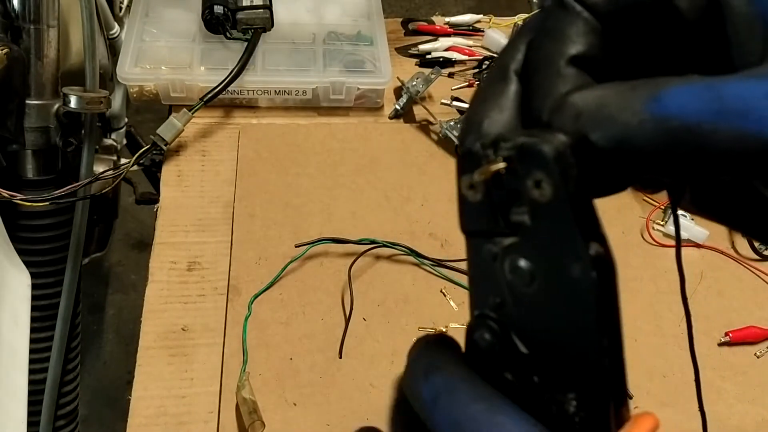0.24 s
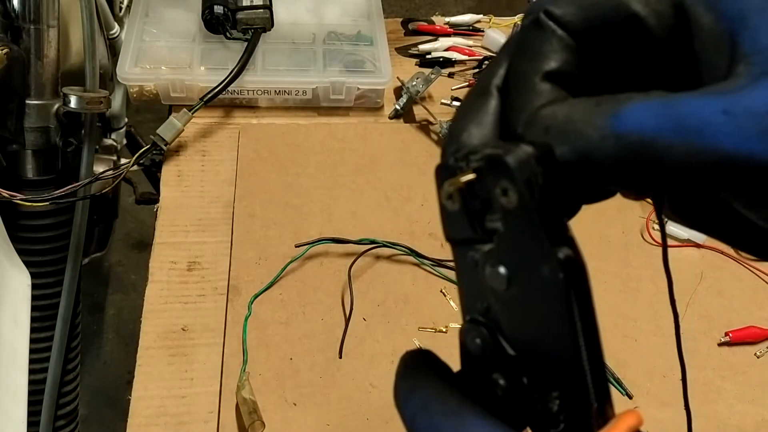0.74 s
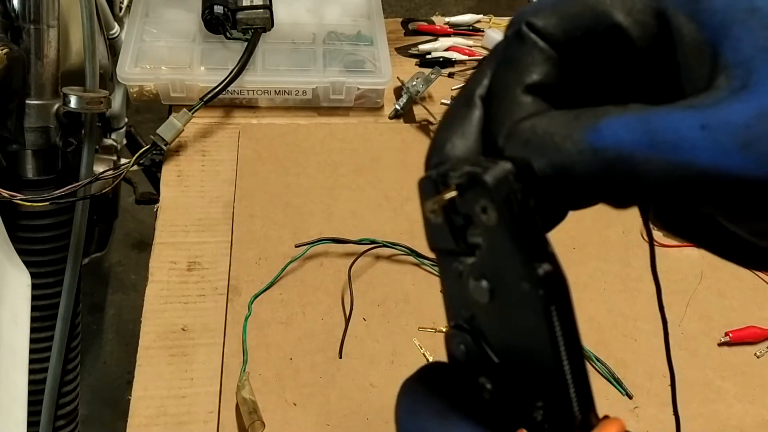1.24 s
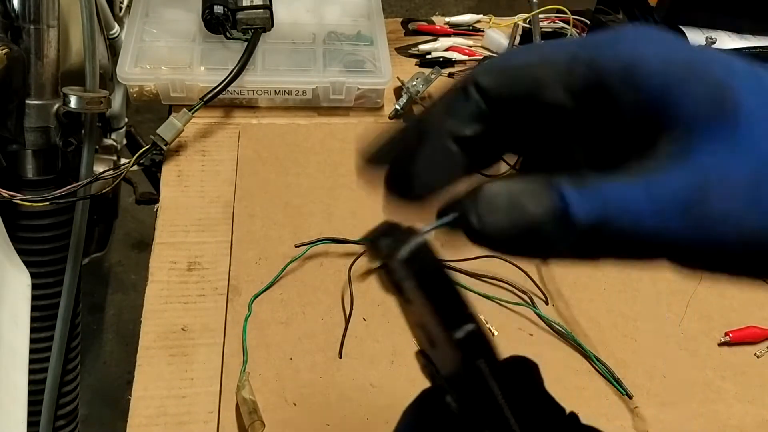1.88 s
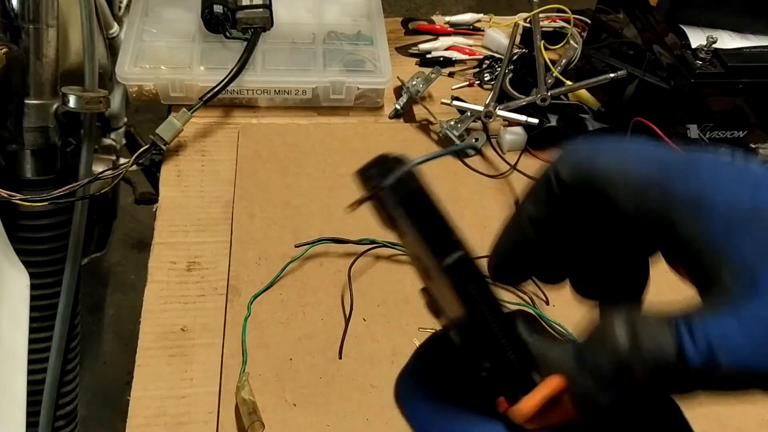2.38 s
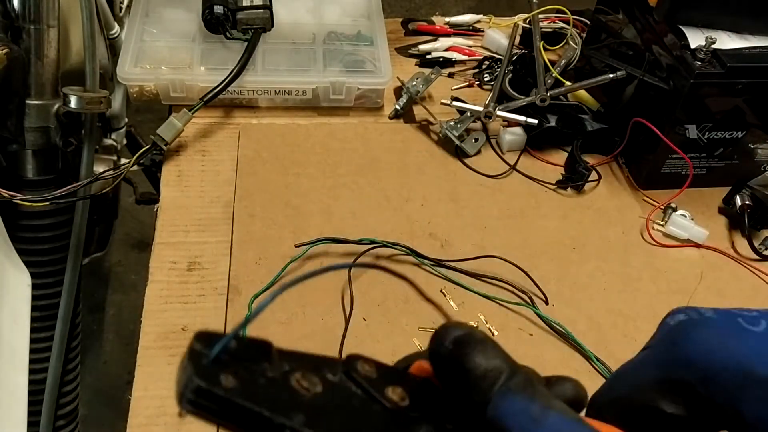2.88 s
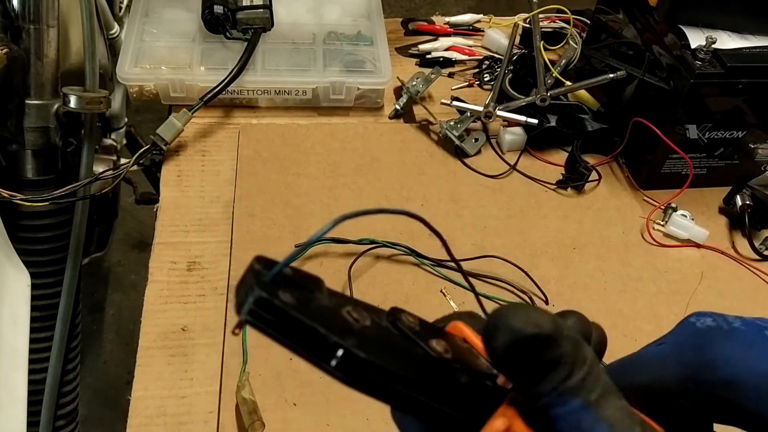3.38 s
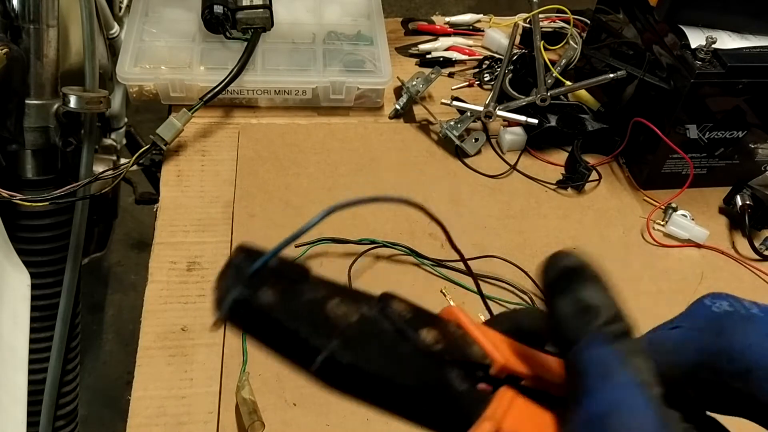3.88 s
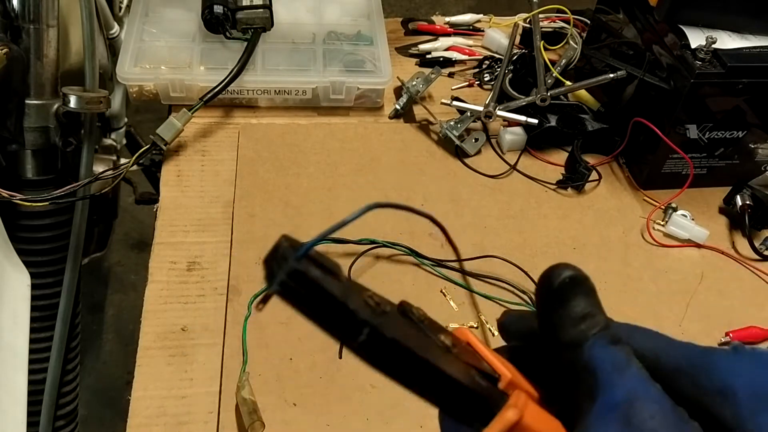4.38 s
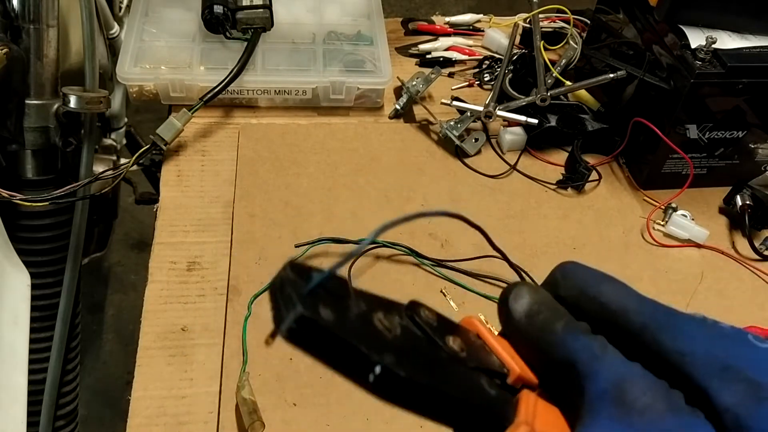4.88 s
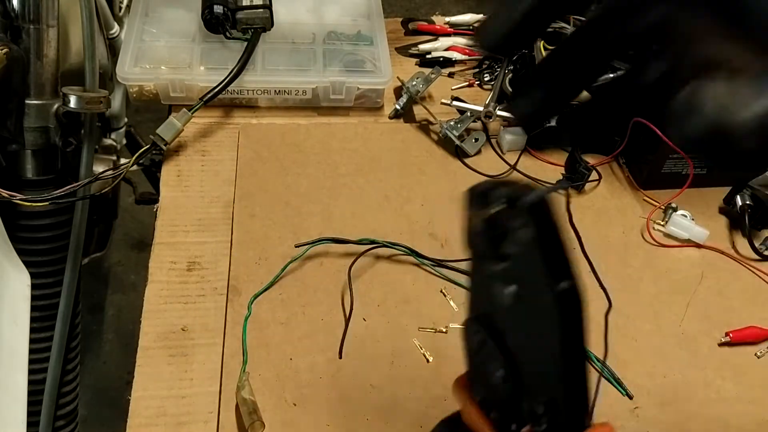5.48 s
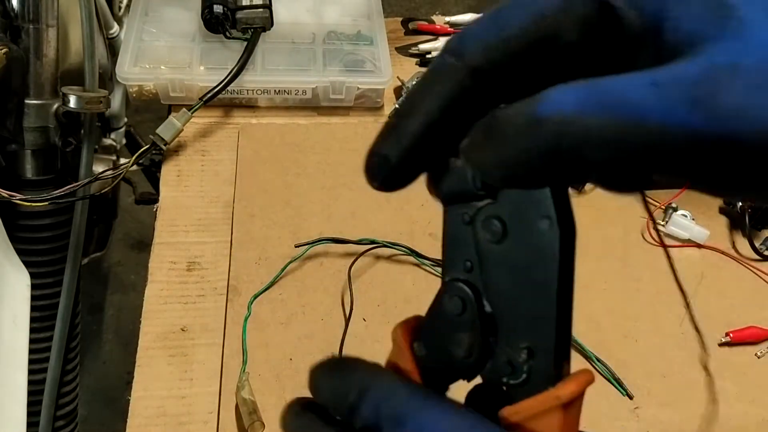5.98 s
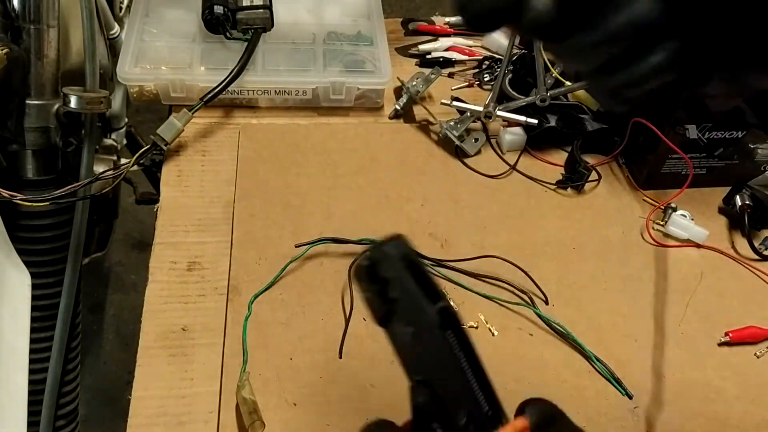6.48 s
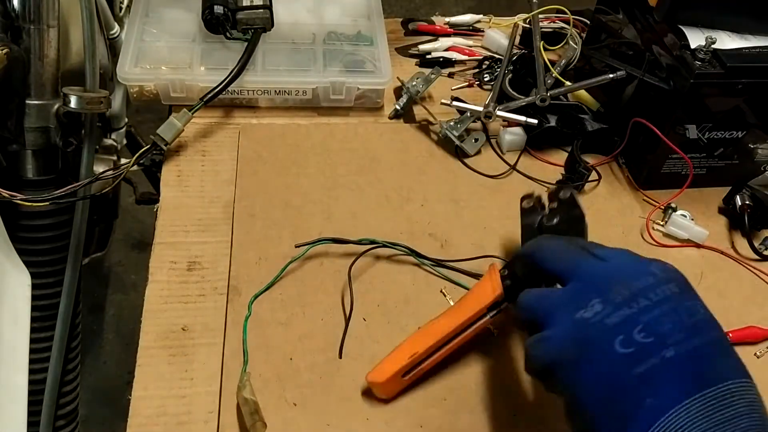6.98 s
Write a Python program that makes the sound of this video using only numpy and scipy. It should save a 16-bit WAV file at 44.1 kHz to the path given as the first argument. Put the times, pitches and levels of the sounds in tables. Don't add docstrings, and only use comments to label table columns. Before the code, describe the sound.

Ratchet crimping pliers snap sharply close up, steel ringing thinly, then a fast clicking run, glove rubs and a final clack onto a cardboard-covered bench.

```python
import sys
import numpy as np
from scipy import signal
from scipy.io import wavfile
from scipy.ndimage import uniform_filter1d, minimum_filter1d

SR = 44100
rng = np.random.default_rng(int(sys.argv[2]) if len(sys.argv) > 2 else 0)


def rack_gain(trim_db):
    fader = np.asarray(trim_db, float)
    return 10 ** (fader / 20)


def master_out(mix):
    frames = np.transpose(np.atleast_2d(mix))
    ceiling = np.clip(frames, -1, 1)
    pcm = np.round(ceiling * 32767).astype(np.int16)
    wavfile.write(sys.argv[1], SR, pcm)


N = 319680

# hz, density_db_per_hz
FLOOR = [(12, -42), (20, -26.5), (43, -3), (130, -15), (177, -5.5), (216, -7.5), (377, -6.5), (590, -11),
         (642, -18.5), (802, -14), (1220, -19), (1330, -18), (3160, -28), (6500, -28.5), (12000, -24),
         (16000, -61.5)]
# hz, level_db
HUM = [(49, -88.5), (100, -77), (185, -70.5)]
# hz, left_right_correlation
LIKENESS = [(60, 0.41), (180, 0.78), (550, 0.15), (1650, -0.39), (4970, 0.87), (11500, -0.22)]
# time_s, bass_db
FAR = [(0, -0.5), (.6, 0), (1.1, -2), (2.198, -3), (2.6, 1), (3.099, -0.5), (3.6, -0.5), (4.501, -2),
       (5.202, -2), (6.2, 1), (6.45, 3.5), (6.9, 5), (7.25, 5)]
# strongest_s, rise_s, fall_s, level_db, brightness_db
STROKES = [(.19, .04, 0.022, -64, -2), (1.97, .03, 0.02, -65, 12.5), (2.548, .04, 0.11, -62, 3),
           (2.69, .06, 0.059, -72, 11), (2.76, .09, 0.022, -61, 6), (2.92, .04, 0.23, -73.5, 6),
           (3.17, .05, 0.02, -56.5, 1), (3.73, .05, 0.043, -57.5, -0.5), (4.09, .04, 0.063, -61, 0),
           (4.335, 0.023, 0.021, -54.5, -1.5), (4.385, .06, 0.033, -62.5, .8), (4.7, .14, .16, -72.5, 5.5),
           (5.23, .03, .06, -62.5, 2), (5.295, .05, 0.025, -52.5, 4.3), (5.352, .05, 0.0069, -47, 4),
           (5.5, .05, 0.17, -60.5, 0.5), (5.6, .06, 0.025, -55, -4), (5.785, .12, 0.024, -62, -1),
           (6.45, .06, 0.36, -65.5, 1), (6.65, .1, 0.14, -64.5, .8), (6.82, .05, 0.17, -57.5, -2),
           (6.94, .09, 0.071, -50.5, 1.5), (7.182, 0.0072, 0.12, -43, -9.5)]
# start_s, end_s, level_db, brightness_db
SHIFTING = [
    (2.553, 3.418, -75.5, 0.2),
    (3.583, 4.238, -75.5, 2.2),
    (4.45, 4.995, -82, 4.5),
]
# hz, wet_db, t60_s
ROOM = [(300, -36, 0.5), (1020, -40, 1), (1800, -38.5, 0.39), (2640, -40.5, 1), (5310, -36, 0.76),
        (7890, -39.5, 0.71), (11480, -38, 0.55)]
# start_s, peak_db, bright_db, contact_ms
GRIP_TICKS = [(.713, -52.5, 9, 1.8), (1.9127, -41, 7, 0.54), (1.9668, -40.5, -27, .6),
              (1.9743, -39.5, -11, 1.8), (1.9775, -36, -29, 0.35), (1.9935, -43.5, 4, 0.88),
              (3.1463, -37, .6, 0.88), (3.2014, -30, -15, 1.8), (3.7426, -39, -34.5, 1.1),
              (3.7822, -34, 7, 2), (4.104, -40.5, -26, 6.1), (4.1414, -61, 23, 2.6),
              (4.1662, -60.5, 19, 4.9), (4.1824, -40.5, -35.5, 3.5), (5.2953, -28.5, 1, 1.4),
              (5.3469, -28.5, -29, 0.39), (5.5148, -36.5, -34, 0.73), (5.5869, -34, .6, 4.7),
              (6.9603, -48.5, 18.5, 4.7), (7.1727, -32.5, -9, 3.1)]
# start_s, peak_db, bright_db, contact_ms
PALM_KNOCKS = [(1.1662, -35.5, -1, 3.8), (1.5672, -31, -5.5, 0.69), (3.3452, -35.5, 2.5, 8.4),
               (3.3511, -46.5, 20, 3.5), (4.0786, -38.5, 2, 3.3), (5.0315, -51, -34, 6),
               (5.2451, -40.5, 12.5, 1.6), (5.568, -48.5, 13, 1.5)]
# start_s, peak_db, bright_db, contact_ms
THIN_TICKS = [(2.931, -31.5, -12, 0.5), (3.1608, -36.5, -18, 1.4), (3.179, -35, -24, 1.5),
              (3.1961, -42.5, 15, 2.6), (3.6686, -44.5, 1, 3.6), (3.738, -39, 8.5, .72),
              (5.2046, -43.5, -2.5, 4.1), (5.228, -44, 5.5, 1.8), (5.2627, -34.5, -10, .83),
              (5.6111, -35, -13, 1.7), (3.7581, -41.5, -1, 0.5), (5.835, -36.5, 20, 0.18),
              (7.211, -37, 17.5, 0.65), (5.879, -36, -14, 2.1), (6.8187, -37.5, 14, 1.1),
              (6.9516, -30, -13, 3)]
# start_s, peak_db, pawl_and_jaw_against_frame_db, handle_push_db, left_right_db
SNAPS = [
    (1.1822, -8, -1, -41, 0),
    (1.5289, -4, -6.5, -43.5, 0),
    (1.5831, -16.5, 8.5, -25.5, -0.5),
    (1.6703, -4, -6.5, -48.5, -0.5),
    (5.995, -3, -6, -40, -0.5),
    (6.0203, -5, -6, -40, 1),
    (6.05, -7, -4, -33, -3),
    (6.082, -8.5, -0.5, -37, -4),
    (6.1441, -3.5, -6.5, -63, 1),
    (7.1973, -7.5, -3.5, -36, 1.5),
]
# hz, width_hz, level_db
STEEL = [(2680, 610, -18.5), (5050, 990, 9), (7620, 2000, -0.5), (8185, 1600, -1), (11810, 3200, 9.5),
         (15250, 12000, 4), (3530, 1000, -15.5)]
# hz, level_db, t60_s
RINGS = [(3430, -67, .45), (3700, -62, .35), (4380, -63, .35), (5140, -58, .4), (8800, -50, .17),
         (10200, -58, .45), (4990, -62, .45), (5860, -62, .3), (11650, -58, .3)]
# start_s, pitch_hz, rise_hz_per_s, level_db, t60_s
SPRING = [
    (1.182, 10725, 340, -50, .9),
    (1.53, 10640, 340, -47, .8),
    (1.669, 11095, 0, -59, 1.6),
    (1.669, 10560, 0, -63, 1.8),
    (6.144, 10980, 0, -52, .8),
]
# start_s, peak_db, pitch_hz
SET_DOWN = [
    (7.187, -12, 1020),
]
PORT_DB = [4.5, -11]
TOP_DB = [
    [-15],
    [-30],
]


def rms_one(x):
    return x / np.sqrt(np.mean(x ** 2) + 1e-20)


def peak_one(x):
    return x / (2.2 * np.sqrt(np.mean(x[..., :150] ** 2, axis=-1, keepdims=True)))


def at_hz(points, hz, axis=1):
    points = np.array(points)
    return np.interp(np.log(hz), np.log(points[:, 0]), points[:, axis])


def band(x, low_hz, high_hz):
    sos = signal.butter(2, [low_hz, min(high_hz, .45 * SR)], "band", fs=SR, output="sos")
    return signal.sosfilt(sos, x)


def resonance(x, hz, width_hz):
    r = np.exp(-np.pi * width_hz / SR)
    zeros = np.array([1, 0, -1]) * (1 - r * r) / 2
    poles = [1, -2 * r * np.cos(2 * np.pi * hz / SR), r * r]
    return signal.lfilter(zeros, poles, x + 1e-18)


def drift(rate_hz):
    r = np.exp(-80 * np.pi * rate_hz / SR)
    slow = signal.lfilter([1], [1, -2 * r, r * r], rng.standard_normal(N // 40 + 2002))[2000:]
    return np.interp(np.arange(N) / 40, np.arange(len(slow)), rms_one(slow))


def add(out, start_s, burst):
    i = round(start_s * SR)
    out[..., i:i + burst.shape[-1]] += burst[..., :N - i]


def chatter(contact_ms, fade_ms, shared, size=1200):
    ms = np.arange(size) * 1000 / SR
    shape = np.clip(ms / .3, 0, 1) * np.exp(-np.maximum(ms - contact_ms, 0) / fade_ms)
    white = rng.standard_normal((3, size))
    own = np.sqrt(1 - np.clip(shared, 0, 1) ** 2)
    return shape * (shared * white[0] + own * white[1:])


def push(hz, size=1200):
    turns = np.arange(size) * hz / SR
    return 3.44 * np.sin(2 * np.pi * turns) * np.exp(-1.4 * turns)


def background():
    floor_db = -64.5 + 2.0
    out, white = 0, rng.standard_normal((2, 2, N))
    edges_hz = 20 * 2 ** np.arange(0, 9.7, 1 / 3)
    far_db = np.interp(np.arange(N) / SR, *np.transpose(FAR))
    together = drift(1.0)
    for k, (low_hz, high_hz) in enumerate(zip(edges_hz, edges_hz[1:])):
        mid, side = band(white[k % 2], low_hz, high_hz)
        hz = np.sqrt(low_hz * high_hz)
        alike = np.clip(at_hz(LIKENESS, hz), -1, 1)
        wander_db = (far_db + 1.8 * together + 2.2 * drift(1.0)) / (1 + (hz / 900) ** 2)
        stereo = np.sqrt(1 + alike) * mid + np.sqrt(1 - alike) * side * [[1], [-1]]
        out = out + rack_gain(at_hz(FLOOR, hz) + wander_db) * stereo
    hum = 0
    for hz, db in HUM:
        level = rack_gain(db + 1.1 * drift(3.2))
        hum = hum + level * np.sin(2 * np.pi * np.cumsum(hz + 2.7 * drift(3)) / SR)
    return rack_gain(floor_db) * rms_one(out) + hum


def gloves():
    stroke_depth_db = 15
    shift_fade_s = 0.16
    t, low, high = np.arange(N) / SR, 0, 0
    moves = [(s, s, *rest) for s, *rest in STROKES]
    moves += [(a, b, shift_fade_s, shift_fade_s, db, bright_db) for a, b, db, bright_db in SHIFTING]
    for start_s, end_s, rise_s, fall_s, db, bright_db in moves:
        before = np.maximum(start_s - t, 0) / max(rise_s, .004)
        after = np.maximum(t - end_s, 0) / max(fall_s, .004)
        pressure = rack_gain(db - stroke_depth_db * np.minimum(before + after, 8))
        low = low + pressure ** 2
        high = high + (rack_gain(bright_db) * pressure) ** 2
    sizes = rack_gain(3.2 * np.minimum(rng.exponential(1, (2, N)), 5)) * rng.standard_normal((2, N))
    slips = rng.random(N) < 14000 / SR
    grains = sizes * slips * rack_gain(1.2 * drift(37))
    dull = np.sqrt(low) * rms_one(band(grains, 870, 3700)) * rack_gain(5.0)
    bright = np.sqrt(high) * rms_one(band(grains, 6600, 14000)) * rack_gain(8.0)
    return dull + bright


def workshop(x):
    t = np.arange(SR) / SR
    build = np.clip(.35 + .65 * (t / .013) ** 2, 0, 1) * (t > .003)
    clumps = rack_gain(3.5 * rms_one(band(rng.standard_normal((2, SR)), 60, 400)) * np.exp(-t / .03))
    response, white = 0, rng.standard_normal((2, 2, SR))
    edges_hz = 150 * 2 ** np.arange(0, 7.1, .5)
    for k, (low_hz, high_hz) in enumerate(zip(edges_hz, edges_hz[1:])):
        hz = np.sqrt(low_hz * high_hz)
        t60_s = at_hz(ROOM, hz, axis=2)
        near_shelves = rack_gain(-60 * t / (.6 * t60_s))
        far_walls = .2 * rack_gain(-60 * t / (1.45 * t60_s))
        reflections = band(white[k % 2], low_hz, high_hz) * (near_shelves + far_walls)
        response = response + rack_gain(at_hz(ROOM, hz)) * reflections
    return signal.fftconvolve(x, response * build * clumps, axes=1)[:, :N]


def ticks():
    out, feed = np.zeros((2, N)), np.zeros((2, N))
    kinds = [   # rows, dull_db, room_db
        (GRIP_TICKS, -8.5, -2),
        (PALM_KNOCKS, -1.5, -2.5),
        (THIN_TICKS, -30, -1)]
    for rows, dull_db, room_db in kinds:
        for start_s, db, bright_db, contact_ms in rows:
            hit = chatter(np.clip(contact_ms, .2, 12), fade_ms=1.0, shared=0.54)
            body = peak_one(band(hit, 1500, 4800))
            bright = rack_gain(bright_db) * peak_one(band(hit, 4500, 15000))
            dull = rack_gain(dull_db) * peak_one(band(hit, 120, 790))
            tick = rack_gain(db) * (body + bright + dull) * rack_gain([[1.5], [-1.5]])
            add(out, start_s - .0003, tick)
            add(feed, start_s, rack_gain(room_db) * tick)
    return out, feed


def pawl():
    jaw_under_pawl_db = -12
    thump_db, thump_hz = -58.5, 140
    out, shoves, strikes = np.zeros((2, N)), np.zeros((2, N)), np.zeros((len(RINGS), N))
    for start_s, db, pawl_db, push_db, pan_db in SNAPS:
        hit = chatter(contact_ms=1.2, fade_ms=.7, shared=.4)
        hit = hit + .1 * chatter(contact_ms=3, fade_ms=3, shared=.3)
        parts = [rack_gain(level_db) * peak_one(resonance(hit, hz, width_hz)) * (-1) ** k
                 for k, (hz, width_hz, level_db) in enumerate(STEEL)]
        frame = parts[0] + parts[6] + 1.91 * (parts[2] + parts[3])
        jaw = rack_gain(pawl_db + jaw_under_pawl_db) * parts[1]
        steel = frame + jaw + rack_gain(pawl_db) * (parts[4] + parts[5])
        add(out, start_s - .0004, rack_gain(db) * steel * rack_gain([[pan_db / 2], [-pan_db / 2]]))
        shove = push(hz=390) + 0.043 * push(hz=95) + 0.067 * peak_one(band(hit, 410, 1400))
        add(shoves, start_s, rack_gain(db) * rack_gain(push_db) * shove * rack_gain([[4], [-8]]))
        add(shoves, start_s, rack_gain(thump_db) * push(thump_hz, size=4000) * rack_gain([[2.5], [-2.5]]))
        strikes[:, round(start_s * SR)] = rack_gain(db + 15 + rng.normal(0, 3, len(RINGS)))
    for k, (hz, level_db, t60_s) in enumerate(RINGS):
        r, w = rack_gain(-60 / (t60_s * SR)), 2 * np.pi * hz / SR
        tone = signal.lfilter([0, np.sin(w)], [1, -2 * r * np.cos(w), r * r], strikes[k] + 1e-18)
        out += rack_gain(level_db) * tone * [[1], [(-1) ** k * 1.5]]
    return out, shoves


def spring():
    out = np.zeros((2, N))
    t = np.arange(SR) / SR
    for start_s, hz, rise_hz_per_s, db, t60_s in SPRING:
        tone = np.sin(2 * np.pi * (hz + rise_hz_per_s * t / 2) * t)
        add(out, start_s, rack_gain(db - 60 * t / t60_s) * tone * [[1], [1]])
    return out


def set_down():
    out, feed = np.zeros((2, N)), np.zeros((2, N))
    for start_s, db, hz in SET_DOWN:
        level = rack_gain(db - 9)
        add(out, start_s + 0.0019, -level * band(push(hz), 164, 3000) * rack_gain([[.5], [-.5]]))
        add(feed, start_s + 0.002, level * band(push(hz), 197, 5200))
    return out, feed


def ports(x):
    port_hz, port_width_hz = 11800, 2400
    hand_hz, hand_width_hz, hand_db = 4800, 3500, -4
    left, right = (side + (rack_gain(db) - 1) * resonance(side, port_hz, port_width_hz)
                   for side, db in zip(x, PORT_DB))
    left = left + (rack_gain(hand_db) - 1) * resonance(left, hand_hz, hand_width_hz)
    return np.array([left, right])


def scene():
    floor, rub = background(), gloves()
    tick, tick_feed = ticks()
    snaps, shoves = pawl()
    laid, laid_feed = set_down()
    echo = workshop(snaps + tick_feed + laid_feed + rub)
    near = snaps + shoves + tick + laid + rub + spring() + echo
    return ports(near) + floor


def thin_slices(x, edge_hz, size=1024, count=6):
    top_drop, mid_drop = .87, .08
    bins_hz, _, z = signal.stft(x, fs=SR, nperseg=size)
    starts = np.arange(0, len(bins_hz), count)
    hz = bins_hz[starts]
    level_db = 10 * np.log10(np.add.reduceat(np.abs(z) ** 2, starts, axis=1) + 1e-20)
    level_db = uniform_filter1d(level_db, size=3, axis=2)
    middle = (hz > 2400) & (hz < 10000)
    top = (hz > edge_hz) & (hz < 17500)
    frame_db = np.max(level_db[:, middle], axis=1, keepdims=True)
    attack = minimum_filter1d(-np.gradient(frame_db, axis=2), size=7, axis=2) < -3
    luck_db = rms_one(uniform_filter1d(rng.standard_normal(level_db.shape[1:]), size=6, axis=1))
    top_bias_db = -13 * (hz < 13000)[:, None] - 9 * (hz > 15600)[:, None]
    top_worth = level_db - .75 * frame_db + 7 * luck_db + top_bias_db
    top_worth = np.where(top[:, None], top_worth, np.nan)
    mid_bias_db = 40 * attack + 3 * (np.abs(hz - 4300) > 1300)[:, None]
    mid_worth = .8 * (level_db - frame_db) - .07 * frame_db + 5 * luck_db + mid_bias_db
    mid_worth = np.where(middle[:, None], mid_worth, np.nan)
    drop = top_worth < np.nanquantile(top_worth, top_drop)
    drop = drop | (mid_worth < np.nanquantile(mid_worth, mid_drop))
    kept = z * ~drop[:, np.arange(len(bins_hz)) // count]
    return signal.istft(kept, fs=SR, nperseg=size)[1][:, :N]


def band_limit(x):
    return signal.sosfilt(signal.butter(12, 16810, fs=SR, output="sos"), x)


def record(dry):
    edge_hz = 12020
    edge = signal.ellip(10, .2, 70, edge_hz, fs=SR, output="sos")
    low = signal.sosfiltfilt(edge, dry)
    thinned = thin_slices(low + rack_gain(TOP_DB) * (dry - low), edge_hz)
    soft = thinned / (1 + (np.abs(thinned) / .64) ** 6) ** (1 / 6)
    mix = signal.sosfilt(signal.cheby2(10, 60, 16800, fs=SR, output="sos"), soft)
    return band_limit(mix)


dry = scene()
out = record(dry)
master_out(out)
```